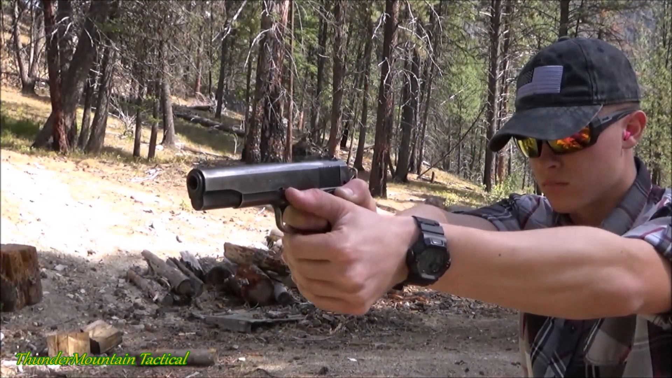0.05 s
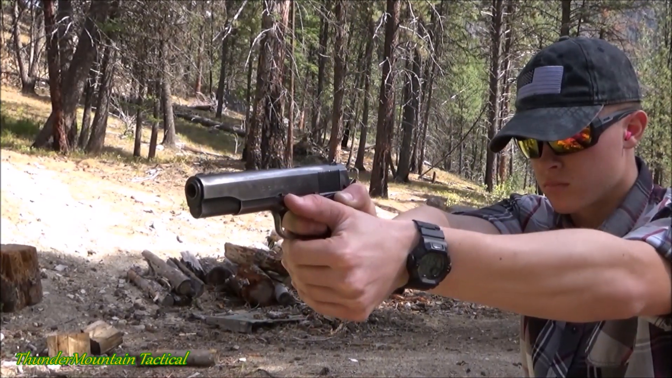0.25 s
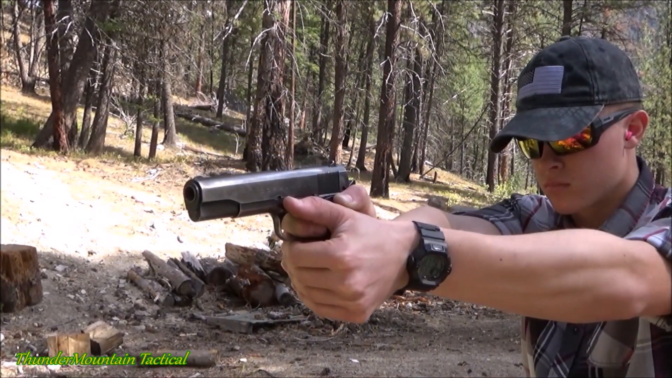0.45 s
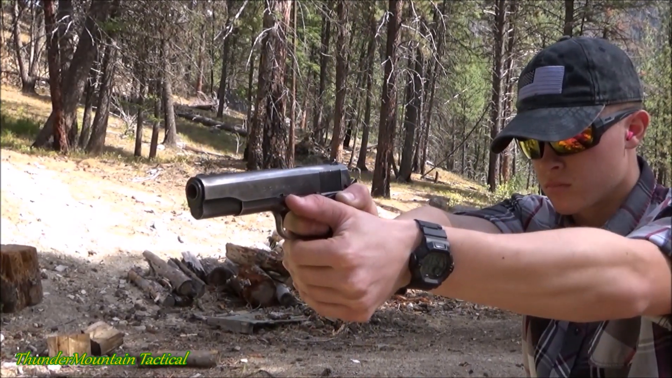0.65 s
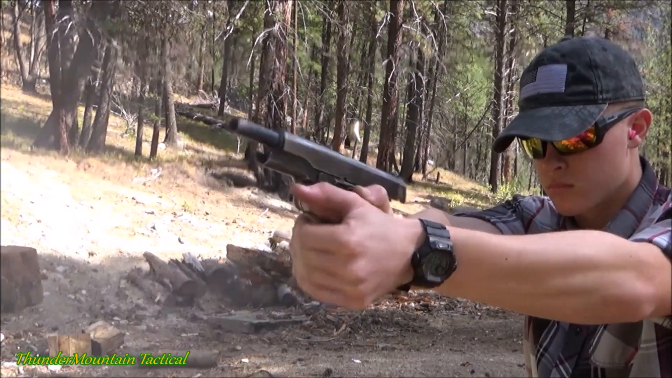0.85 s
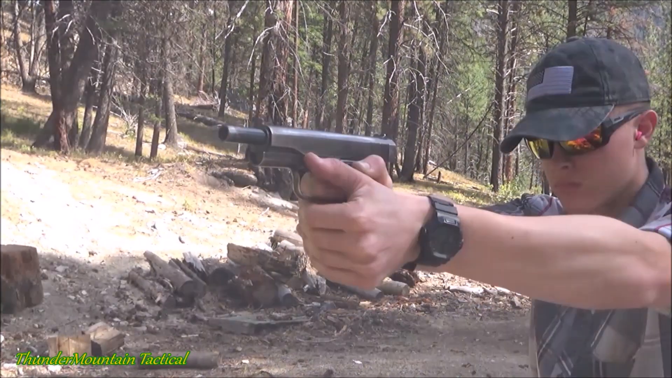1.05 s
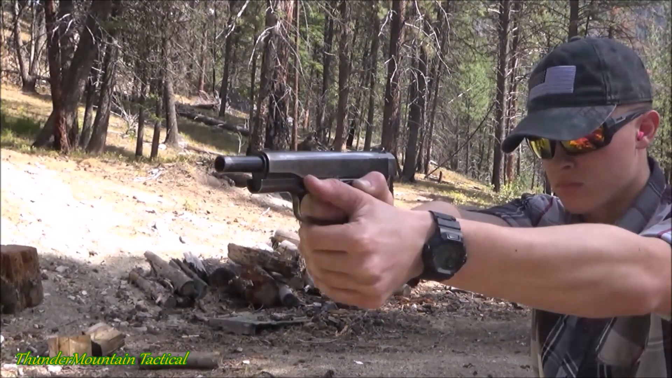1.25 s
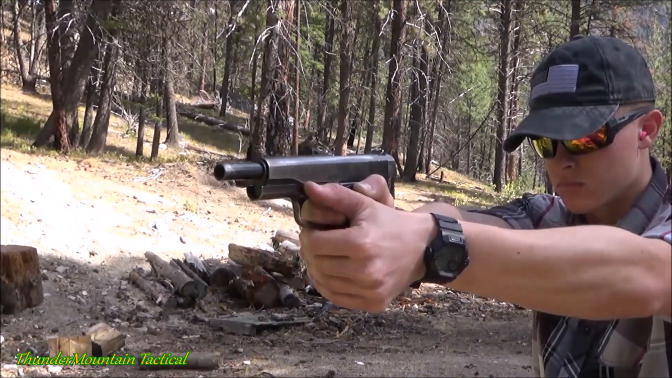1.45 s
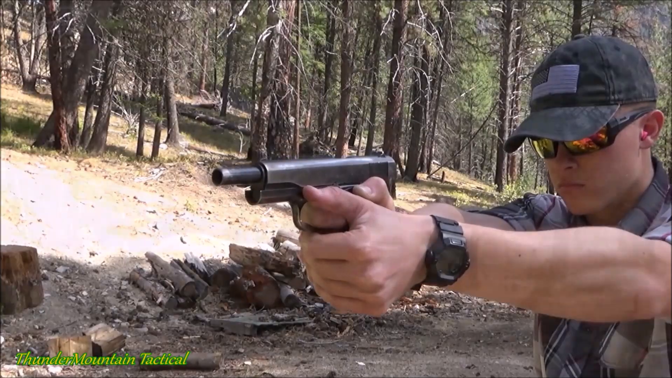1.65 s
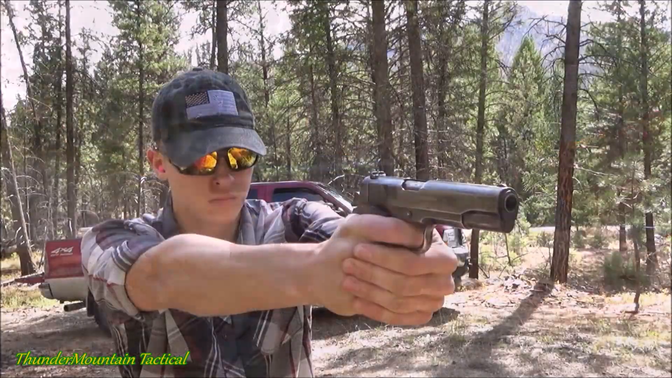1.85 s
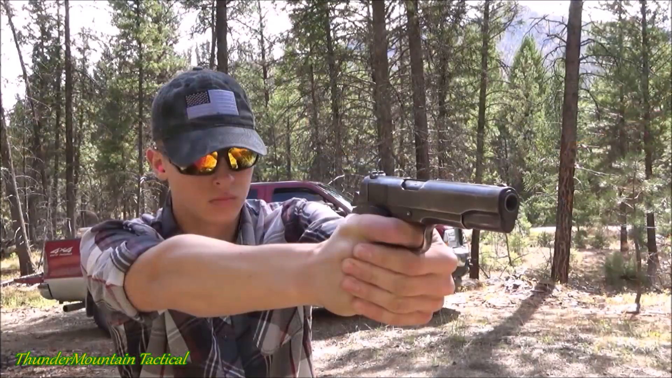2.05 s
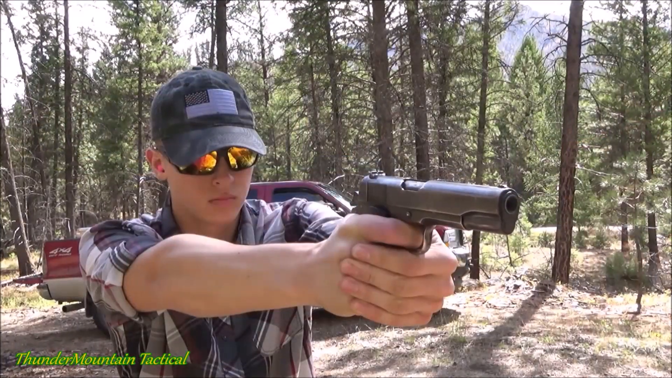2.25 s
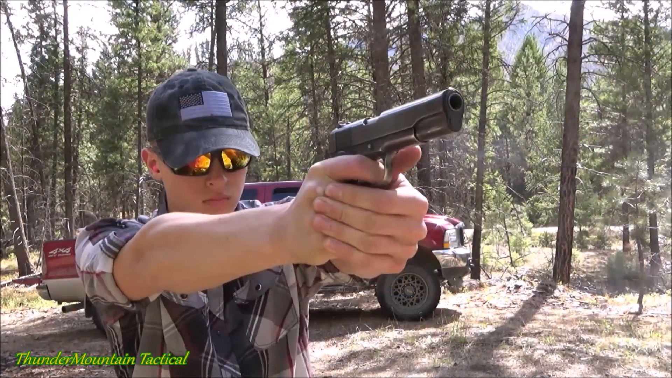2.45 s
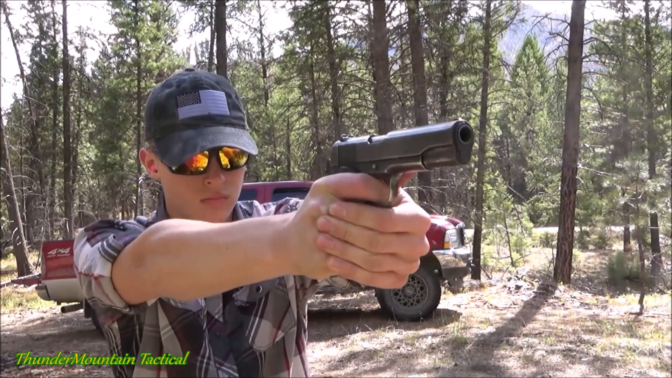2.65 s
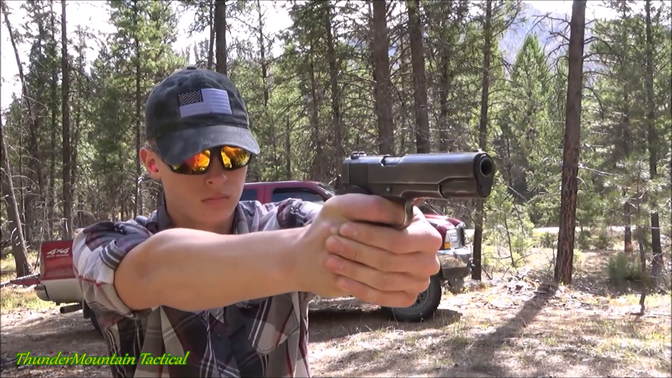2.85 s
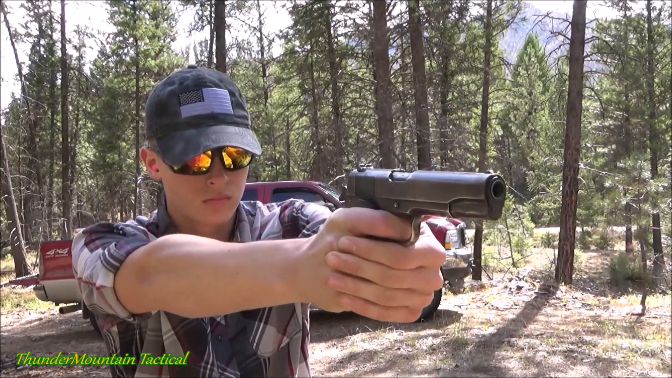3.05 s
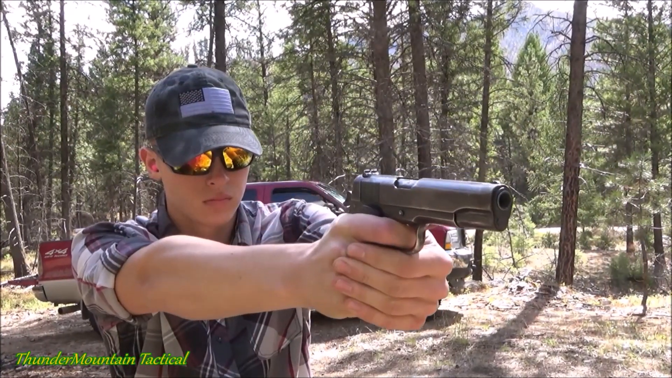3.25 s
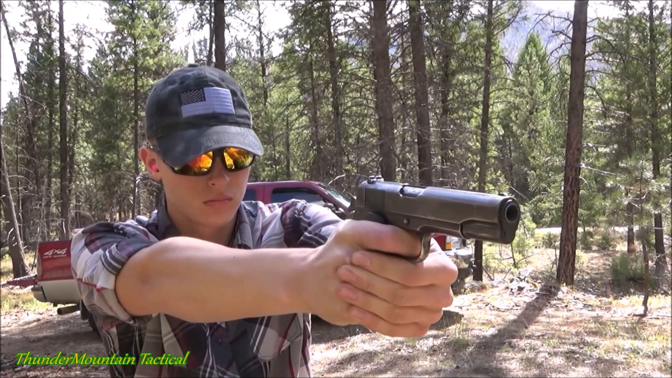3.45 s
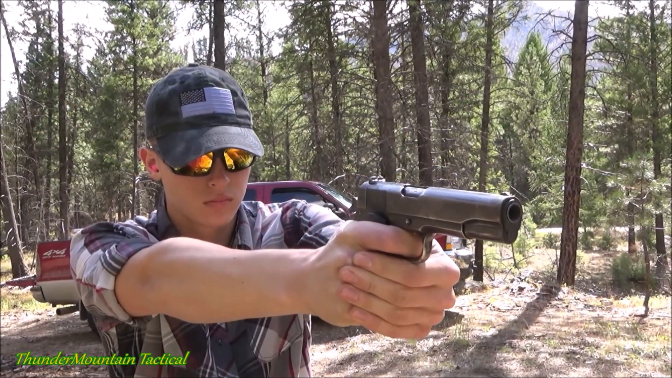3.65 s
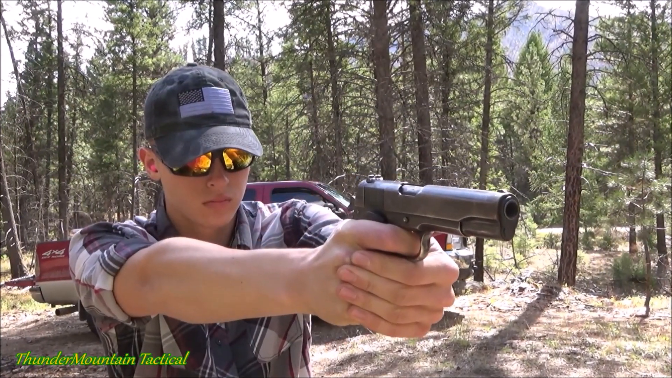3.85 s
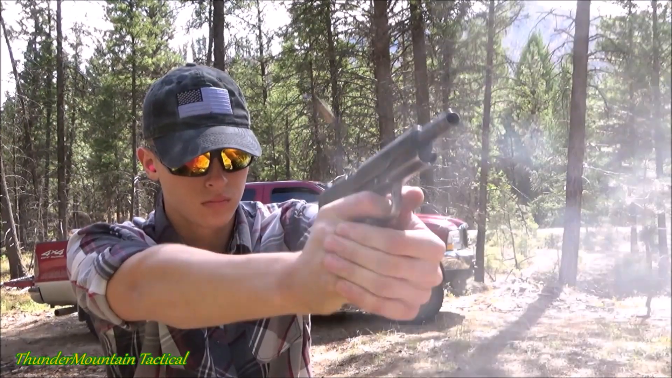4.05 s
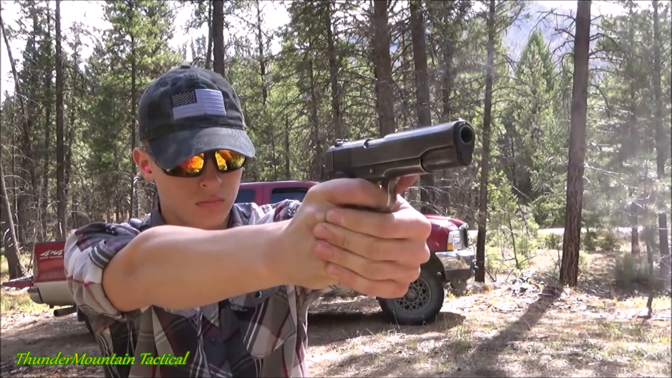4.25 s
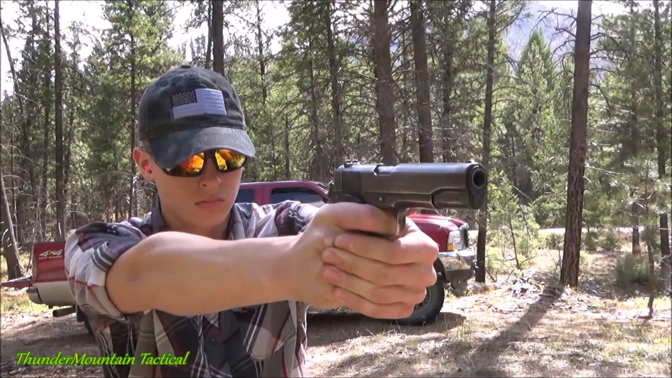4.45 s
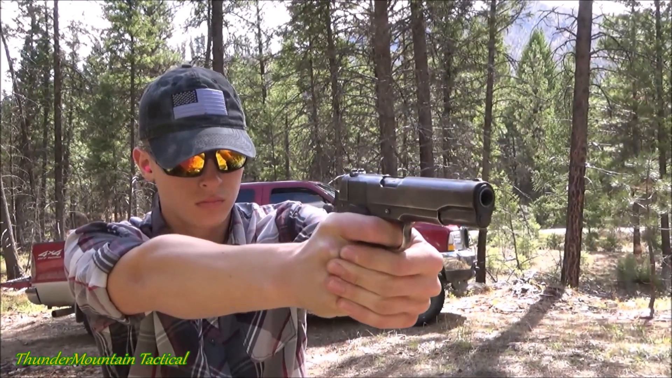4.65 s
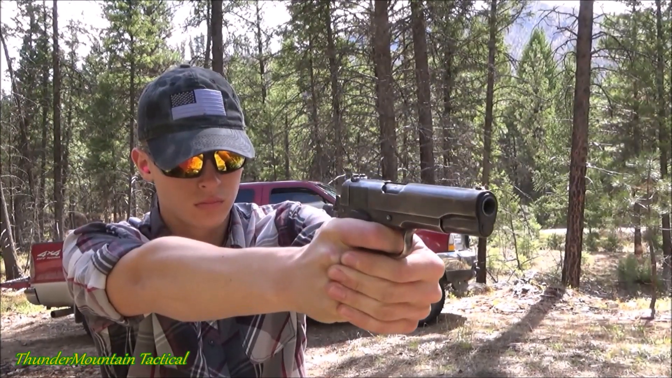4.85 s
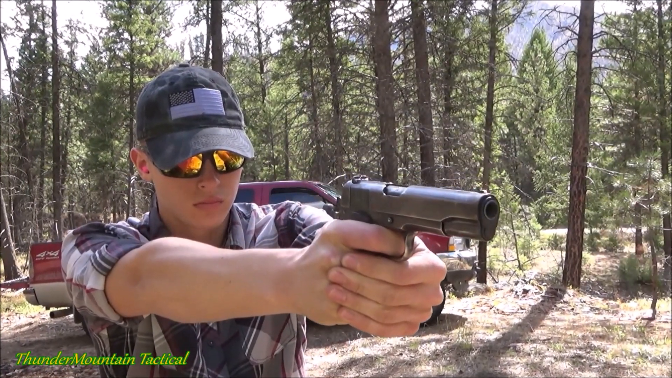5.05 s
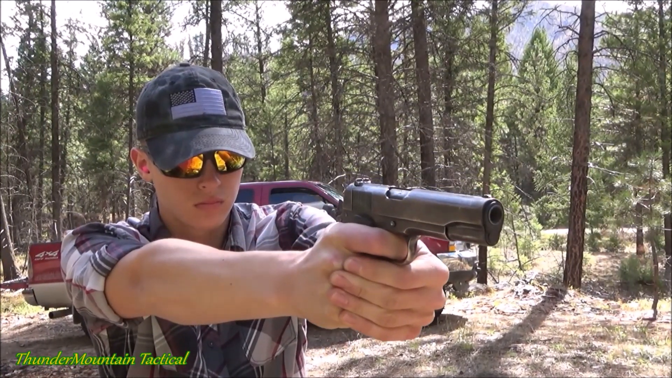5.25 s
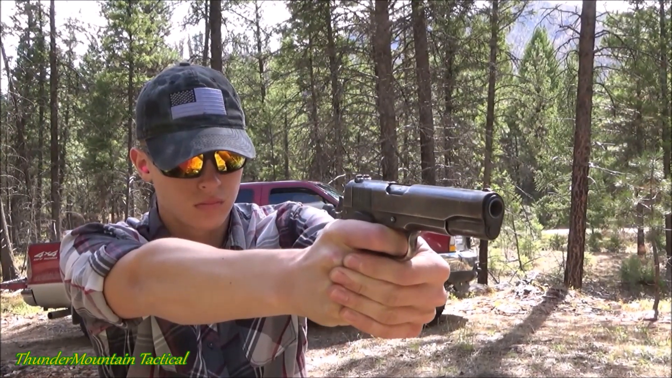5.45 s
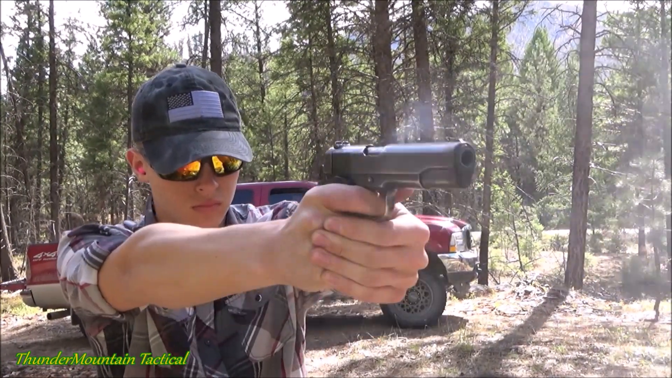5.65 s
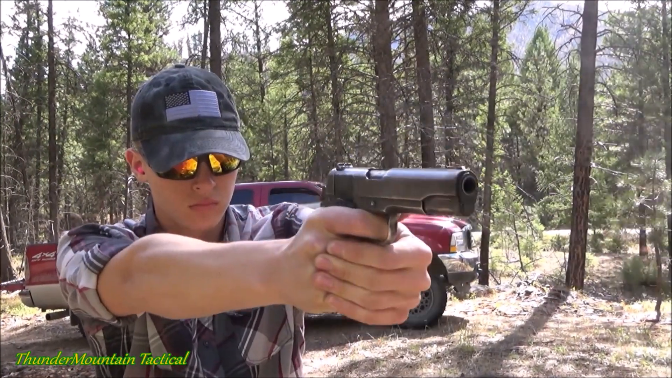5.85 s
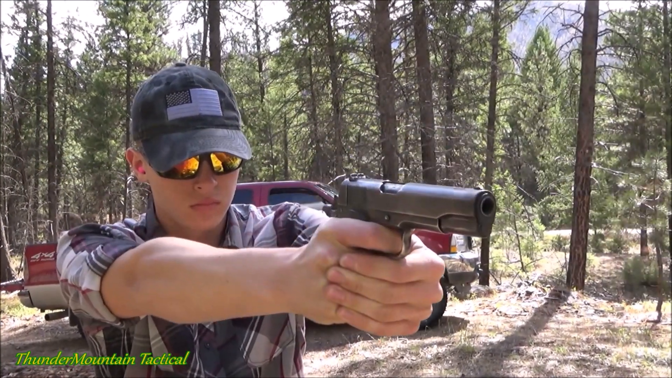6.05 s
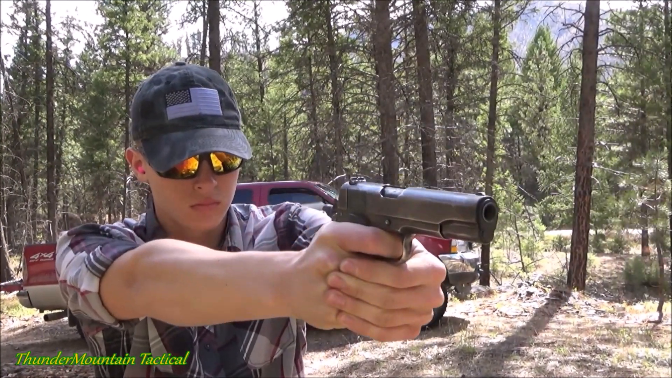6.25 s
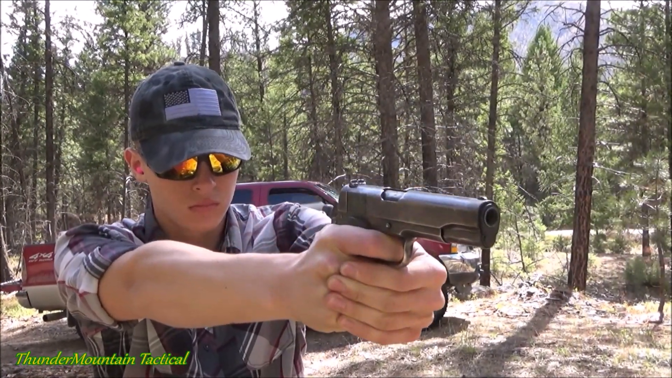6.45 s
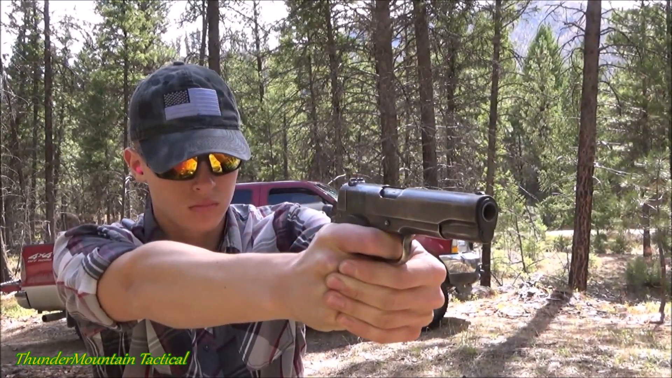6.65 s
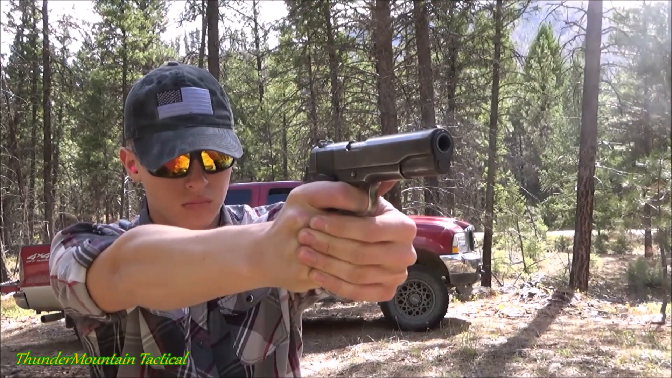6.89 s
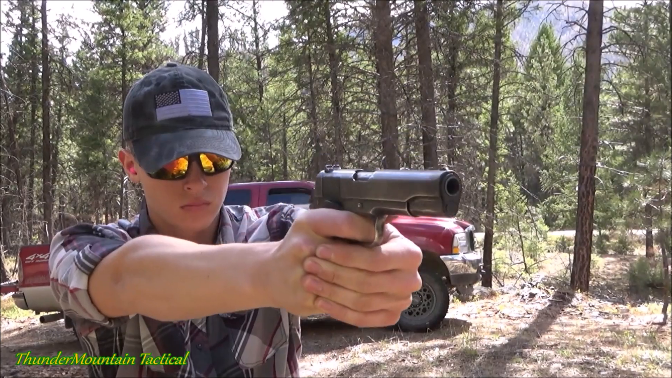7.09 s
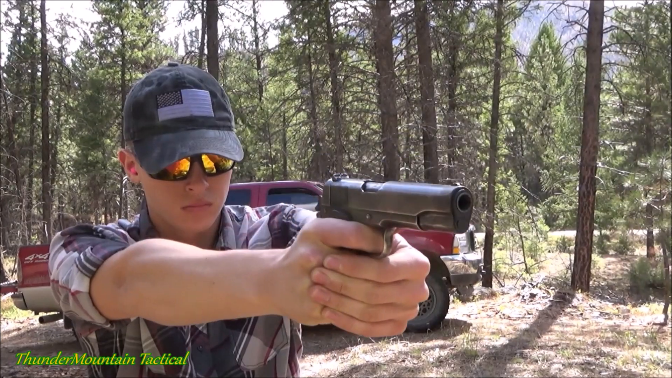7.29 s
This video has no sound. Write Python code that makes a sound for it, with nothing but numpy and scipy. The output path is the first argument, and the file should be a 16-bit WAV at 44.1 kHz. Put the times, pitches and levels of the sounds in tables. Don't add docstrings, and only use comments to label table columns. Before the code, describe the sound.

Outdoors among dense trees, a handgun fires five separate shots near the microphone: one, then a crossfade to a second position, then four more, the last two closest together. Each is a sharp crack with a short low thump, followed by a wide echo that darkens as it fades. Between shots, light brass pings, gritty ticks, tiny scuffs, faint hiss and low rumble are heard.

```python
import sys
import numpy as np
from scipy import signal
from scipy.io import wavfile
from scipy.ndimage import uniform_filter1d

SR = 44100
rng = np.random.default_rng(int(sys.argv[2]) if len(sys.argv) > 2 else 0)


def wrap_up_sound(samples):
    columns = np.atleast_2d(samples).T
    tamed = np.clip(columns, -1, 1)
    steps = np.round(tamed * 32767).astype(np.int16)
    wavfile.write(sys.argv[1], SR, steps)


def to_linear_factor(level_db):
    exponent = np.asarray(level_db, float) / 20
    return 10 ** exponent


N = 322809
SIZE, HOP = 1024, 256
SECOND_PLACE_IN_S, FIRST_PLACE_OUT_S = 1.815, 2.045


def evened(x):
    return x / np.sqrt(np.mean(x ** 2) + 1e-20)


def read(points, hz):
    f, value = np.transpose(points)
    return np.interp(np.log(hz + 1), np.log(f + 1), value)


def bell(t, centre, width):
    return np.exp(-.5 * ((t - centre) / width) ** 2)


def sides(pan_db):
    return to_linear_factor(np.array([[.5], [-.5]]) * pan_db)


def add(mix, s, sound):
    part = mix[:, round(s * SR):][:, :sound.shape[1]]
    part += sound[:, :part.shape[1]]


def banded(x, hz, octaves):
    edges = np.clip(hz * 2 ** (octaves * np.array([-.5, .5])), 20, 20000)
    return evened(signal.sosfilt(signal.butter(2, edges, "band", fs=SR, output="sos"), x))


# frequency in Hz, left-right likeness from 0 to 1.
LIKENESS = [(60, .95), (200, .91), (420, .72), (900, .55), (1650, .45), (4970, .55), (8500, .8),
            (11000, .96), (15000, .995)]


def shaped(pair, field_db):
    hz, t, (a, b) = signal.stft(pair, SR, nperseg=SIZE, noverlap=SIZE - HOP)
    same = np.clip(read(LIKENESS, hz), 0, 1)[:, None]
    spread = np.sqrt((1 - same) / (1 + same))
    z = np.array([a + spread * b, a - spread * b]) / np.sqrt(1 + spread ** 2)
    z = z * to_linear_factor(field_db(hz[:, None], t))
    return signal.istft(z, nperseg=SIZE, noverlap=SIZE - HOP)[1][:, :pair.shape[1]]


def since_shot():
    t = np.arange(N) / SR
    fired = np.array(sorted(row[0] for row in SHOTS))
    return t - fired[np.searchsorted(fired, t) - 1]


# frequency in Hz, level in dB per Hz.
HISS_COLOUR = [(18, -39), (30, -9), (70, -5), (146, -11), (332, -2), (399, -4), (659, -2), (1890, -14),
               (14800, -32.5), (16500, -44.5)]


def hiss():
    first_db, second_db, sink_db_per_s = -73.5, -67.5, 2
    place_db = np.where(np.arange(N) / SR < SECOND_PLACE_IN_S, first_db, second_db)
    db = place_db - sink_db_per_s * (since_shot() - 1)
    noise = shaped(rng.standard_normal((2, N)), lambda hz, t: read(HISS_COLOUR, np.maximum(hz, 2500)))
    return evened(noise) * to_linear_factor(db)


# frequency in Hz, level in dB per Hz.
RUMBLE_COLOUR = [(12, -28), (20, -6.5), (71, -19), (100, -5.5), (146, -16.5), (481, 1.5), (905, -10.5),
                 (1500, -11), (1950, -45.5), (3300, -120)]


def rumble():
    level_db, lumps_db, roll_db, roll_t60 = -65, 2.5, 9, 2.7
    roll = 1 + to_linear_factor(roll_db - 60 * since_shot() / roll_t60)
    noise = shaped(rng.standard_normal((2, N)),
                   lambda hz, t: read(RUMBLE_COLOUR, hz) - 9 * np.log2(1 + hz / 300))
    lumps = evened(uniform_filter1d(uniform_filter1d(rng.standard_normal(N), 4000), 3000))
    return evened(noise) * roll * to_linear_factor(level_db + lumps_db * lumps)


# start in seconds, level in dB, centre in Hz, t60 in seconds.
FOOT = (.442, -38, 200, .055)


def thud(db, hz, t60):
    t = np.arange(4000) / SR
    push = banded(rng.standard_normal(len(t)), hz, 2.5)[None]
    return to_linear_factor(db - 60 * t / t60) * np.minimum(t / 0.0023, 1) * push


def trunks(length, spread_db=2.5, per_s=5000):
    sign = rng.choice([-1., 1.], (2, length)) * (rng.random((2, length)) < per_s / SR)
    size_db = spread_db * np.minimum(rng.exponential(1, (2, length)), 4)
    return evened(sign * to_linear_factor(size_db))


# start in seconds, level in dB, length in seconds, centre in Hz.
SKIDS = [(0.105, -71, 0.032, 7000), (.65, -69, 0.05, 8000), (1.571, -45, 0.036, 8500),
         (3.045, -70.5, 0.29, 10000), (3.477, -53, 0.03, 7000), (4.767, -54, 0.038, 7300),
         (5.248, -50.5, 0.031, 7500), (5.249, -52.5, 0.11, 4280), (6.158, -53, .03, 8000),
         (6.385, -64, .008, 9000), (6.407, -68, .006, 10000), (7.275, -51, 0.043, 7500)]


def scuff(db, length, hz):
    u = np.arange(round(length * SR)) / (length * SR)
    grains = banded(trunks(SR // 2, per_s=6000), hz, 1.5)[:, :len(u)]
    both = grains + 0.41 * grains[::-1]
    return to_linear_factor(db - 4.5) * both * np.minimum(u / 0.068, 1) * (1 - u)


# start in seconds, level in dB, pitch in Hz, left minus right in dB.
SNAPS = [(0.1254, -44, 5230, 4), (0.4453, -43, 5200, 7), (2.0422, -49, 2500, -1.5), (2.0966, -43, 2670, 3),
         (3.6547, -26.5, 3020, 4), (3.6724, -55, 3170, 2.2), (3.679, -55, 3400, 1.9),
         (1.596, -44, 6000, .1), (3.6884, -54, 2710, 1.5), (3.9543, -48.5, 3170, 8.5),
         (4.1196, -50.5, 2910, -3), (4.774, -33, 3900, -1.1), (4.792, -27, 3430, 4),
         (4.8052, -48, 2750, -5), (4.9856, -47, 5600, 6), (4.733, -52, 9000, .1), (4.915, -54, 9500, -2),
         (5.2274, -55, 2530, 5), (5.3144, -46, 3220, 1.1), (5.4017, -58, 2690, .1), (6.745, -37, 5050, 5)]


def tick(db, hz, t60=0.0097):
    t = np.arange(1600) / SR
    snap = 0.41 * banded(rng.standard_normal(len(t)), 5700, 1.45) + 0.33 * np.sin(2 * np.pi * hz * t)
    return to_linear_factor(db - 60 * t / t60)[None] * snap


# start in seconds, level in dB, then low, middle and high ring in dB.
LANDINGS = [(0.1149, -21, -30, -31, -23), (1.5796, -25, -19, -34, -38), (3.477, -17, -11.5, -35, -25),
            (4.782, -16.5, -11, -42, -25), (6.167, -22, -11, -36, -20), (7.2852, -24, -11, -35, -24)]
# frequency in Hz, level in dB, t60 in seconds.
MODES = [
    [(4090, 0, .026), (4420, -3, .022)],
    [(5227, 0, .14), (6210, -9, .035)],
    [(8900, 0, .06), (11200, -14, .03), (13100, -24, .06)],
]
# frequency in Hz, level in dB per Hz.
GRIT_COLOUR = [(590, -42), (1000, -30), (1950, -20), (3200, -10), (3940, -11.5), (5350, 3), (7790, -9.5),
               (11600, -13), (16500, -26)]


def case(db, *ring_db):
    t = np.arange(5000) / SR
    grit = evened(shaped(rng.standard_normal((2, len(t))), lambda hz, t: read(GRIT_COLOUR, hz)))
    tube = np.zeros(len(t))
    for group, strike_db in zip(MODES, ring_db):
        for hz, mode_db, t60 in group:
            tube += to_linear_factor(strike_db + mode_db - 60 * t / t60) * np.sin(2 * np.pi * hz * t)
    u = t / 0.00056
    return to_linear_factor(db) * (.5 * grit * u * np.exp(1 - u) + tube * np.minimum(u, 1))


def stand():
    patches = rng.standard_normal((SIZE // 2 + 1, 3 * SR // HOP + 9))
    patches = uniform_filter1d(uniform_filter1d(patches, 14, 0), 8, 1)
    return trunks(3 * SR), 1.4 * evened(patches)


# frequency in Hz, level in dB per Hz.
YOUNG_COLOUR = [(18, -55.5), (30, -23.5), (60, -23.5), (235, -8), (368, -4.5), (443, -5.5), (1150, -3.5),
                (1890, -12), (2160, -8.5), (5030, -12.5), (7280, -11), (15200, -22.5), (16500, -68)]
# frequency in Hz, loss in dB per second of travel.
TRAVEL_LOSS = [(30, 46), (120, 35.5), (250, 18.5), (500, -6.5), (1000, 0.5), (2000, 8.5), (3000, 24),
               (5000, 43.5), (8000, 87), (12000, 107.5), (14500, 136.5), (16500, 196.5)]
# shade time in seconds, shade in dB, bright time in seconds, brightness in dB.
ECHO_TREBLE = [(0.047, -4, .25, 2), (0.036, -4, 0.32, 2.5)]


def distance_colour(hz, t, place, patches):
    settle = read([(200, 0.2), (700, 1.5)], hz)
    db = read(YOUNG_COLOUR, hz) - read(TRAVEL_LOSS, hz) * settle * (1 - np.exp(-t / settle))
    shade_s, shade_db, bright_s, bright_db = ECHO_TREBLE[place]
    treble_db = -0.53 + shade_db * bell(t, shade_s, 0.04) + bright_db * bell(t, bright_s, 0.25)
    db = db + treble_db * np.clip(np.log2(hz / 1200 + .01), 0, 1.5)
    late_bass_db = [-6, -4][place]
    db = db + late_bass_db * bell(t, .55, 0.24) * np.clip(np.log2(450 / (hz + 1)), 0, 1)
    middle = (hz > 300) & (hz < 1500)
    middle_power = 2 / SIZE * (to_linear_factor(db) ** 2 * middle).sum(0)
    return db - 10 * np.log10(middle_power) + patches[:, :len(t)]


# seconds after the shot, change in dB.
STAND_DENTS = [
    [(.096, -2.5), (.188, 3.5), (.355, -0.5), (.435, -2.5), (.513, -2), (.583, 1), (.67, -1), (.77, 0.5),
     (.85, -1.5), (.865, 2.5), (.926, 0.5), (1.052, -0.5), (1.066, 1)],
    [(.062, -2.5), (.162, 0.5), (.279, -0.5), (.325, -3), (.373, -1.5), (.463, -0.5), (.491, -2.5),
     (.571, -1.5), (.848, -1.5), (.868, 4), (.944, 1.5), (.975, -3.5)],
]


def echo_db(t, place):
    near = [6.5, 8][place] - 60 * t / [0.34, .35][place]  # dB, t60 in s
    hold_s, thin_db_per_s = [(0.14, 28), (0.16, 26.5)][place]
    body = -thin_db_per_s * np.maximum(t - hold_s, 0)
    hills = [-11, -10.5][place] - [13, 12.5][place] * t  # dB, dB per s
    total = 10 * np.log10(to_linear_factor(near) ** 2 + to_linear_factor(body) ** 2 + to_linear_factor(hills) ** 2)
    return total + sum(db * bell(t, s, 0.0076) for s, db in STAND_DENTS[place])


def forest(db, place, place_taps, patches, rise_s=0.0069):
    t = np.arange(place_taps.shape[1]) / SR
    steady = .9
    taps = steady * place_taps + np.sqrt(1 - steady ** 2) * trunks(len(t))
    level = to_linear_factor(db + echo_db(t, place)) * (1 - np.exp(-(t / rise_s) ** 2))
    return shaped(taps, lambda hz, t: distance_colour(hz, t, place, patches)) * level


# seconds after the shot, level in dB, left minus right in dB.
REFLECTORS = [
    [(.099, -14.5, -5), (.279, -13, 12), (.345, -18, -8), (.457, -24, -.5), (.554, -31, .6),
     (.58, -21.5, -2), (.623, -25, 1), (1.0195, -36, -2), (1.0615, -30, -1)],
    [(.1555, -40, 12), (.2775, -13, 5), (.3855, -25, 6), (.4595, -23, -3), (.5005, -37, 2),
     (.5685, -19, -2.5)],
]


def slopes(place, blast_ms=0.422, trim_db=-3):
    out = np.zeros((2, 2 * SR))
    for delay, db, pan_db in REFLECTORS[place]:
        u = np.arange(300) / SR / (blast_ms / 1000 * (1 + delay))
        wave = -np.sin(3.75 * u) * u * np.exp(1 - u)
        add(out, delay, to_linear_factor(db + trim_db) * sides(pan_db) * wave)
    return out


def lead_wash(length, db):
    u = np.linspace(0, 1, round(length * SR) + 64)
    noise = banded(rng.standard_normal((2, len(u))), 6500, 2.4)
    return to_linear_factor(db) * noise * np.minimum(u / 0.22, 1) * (1 + 2.5 * u ** 4)


# frequency in Hz, level in dB per Hz.
BOOM_COLOUR = [(18, -55.5), (30, -29.5), (193, -15), (683, -4), (834, -10), (1240, -5), (1590, -19.5),
               (1850, -6.5), (2020, -26.5), (6000, -37), (7800, -56.5), (13200, -120)]


def boom(db):
    t = np.arange(6000) / SR
    body = evened(shaped(trunks(len(t), per_s=3400), lambda hz, t: read(BOOM_COLOUR, hz)))
    swell = (1 - np.exp(-(t / 0.0038) ** 2)) * np.exp(-(t / 0.034) ** 3)
    own = rng.standard_normal((2, len(t)))
    shove = banded(own + 0.18 * own[::-1], 90, 2.4) * np.exp(-t / 0.029)
    return to_linear_factor(db) * (body * swell + 0.15 * shove * np.minimum(t / 0.0057, 1))


# frequency in Hz, level in dB per Hz.
CRACK_COLOUR = [(59, -37.5), (100, -19), (1330, -8.5), (3620, -9), (4200, -9), (6050, -5.5), (13000, -16),
                (14800, -19), (16500, -33)]


def crack(db, slide_db, slide_s=.0585):
    t = np.arange(6000) / SR
    gas = evened(shaped(rng.standard_normal((2, len(t))), lambda hz, t: read(CRACK_COLOUR, hz)))
    hold = to_linear_factor(-60 * np.maximum(t - .007, 0) / 0.034)
    slide = to_linear_factor(slide_db - 60 * (t - slide_s) / 0.085) * (t > slide_s)
    return to_linear_factor(db) * gas * (hold + slide)


# start in seconds, crack in dB, place 0 or 1, echo in dB, seconds of faint noise ahead.
SHOTS = [
    (-.5855, -99, 0, -24.5, 0),
    (0.9583, -16, 0, -24.5, .0085),
    (-.2, -99, 1, -24, 0),
    (2.4002, -17.5, 1, -23.5, 0.0079),
    (4.1558, -16, 1, -24, .0084),
    (5.6506, -15.5, 1, -25, .0054),
    (6.7719, -16, 1, -25.5, 0.0096),
]


def scene():
    places = np.zeros((2, 2, SR + N))
    stands = [stand(), stand()]
    for s, db, place, level_db, ahead in SHOTS:
        place = round(place)
        mix = places[place]
        add(mix, 1 + s, sides([.3, -1.6][place]) * forest(level_db, place, *stands[place]))
        add(mix, 1 + s, slopes(place))
        add(mix, 1 + s - ahead, lead_wash(ahead, db + [-31, -21][place]))
        add(mix, 1 + s, boom(db - 3.0))
        add(mix, 1 + s, crack(db, slide_db=[-40, -5][place]))
    t = np.arange(N) / SR
    first = places[0, :, SR:] * (t < FIRST_PLACE_OUT_S)
    second = places[1, :, SR:] * (t > SECOND_PLACE_IN_S)
    mix = first + second + hiss() + rumble()
    add(mix, FOOT[0], thud(*FOOT[1:]))
    for s, db, length, hz in SKIDS:
        add(mix, s, scuff(db, length, hz))
    for s, db, hz, pan_db in SNAPS:
        add(mix, s, sides(pan_db) * tick(db, hz))
    for s, db, *ring_db in LANDINGS:
        add(mix, s, case(db, *ring_db))
    return mix


def starved(x, from_hz=10000, under_db=44, scatter_db=8.5):
    hz, t, z = signal.stft(x, SR, nperseg=SIZE, noverlap=SIZE - HOP)
    power = (abs(z) ** 2).sum(0)
    bins, frames = 10, 4
    band, moment = np.arange(len(hz)) // bins, np.arange(len(t)) // frames
    cell = np.add.reduceat(power, np.arange(0, len(hz), bins))
    cell = np.add.reduceat(cell, np.arange(0, len(t), frames), axis=1)
    loud_db = 10 * np.log10(cell.max(0) + 1e-12)
    habit = evened(uniform_filter1d(rng.standard_normal(cell.shape), size=2, axis=1))
    limit_db = loud_db - under_db + scatter_db * habit
    limit_db += 2.6 * np.minimum(loud_db + 23, 0) + (hz[::bins, None] - 12000) * .004
    weak = (10 * np.log10(cell + 1e-16) < limit_db)[band][:, moment] & (hz > from_hz)[:, None]
    thinned = z * np.where(weak, to_linear_factor(-35), 1)
    return signal.istft(thinned, nperseg=SIZE, noverlap=SIZE - HOP)[1][:, :N]


def roll_off(x):
    return signal.sosfilt(signal.butter(12, 16820, fs=SR, output="sos"), x)


def record(dry):
    ceiling = to_linear_factor(-6.5)
    limited = starved(ceiling * np.tanh(dry / ceiling))
    low = signal.oaconvolve(limited, signal.firwin(255, 15900, fs=SR)[None], "same")
    finished = low + to_linear_factor(-16) * (limited - low)
    return roll_off(finished)


dry = scene()
out = record(dry)
wrap_up_sound(out)
```